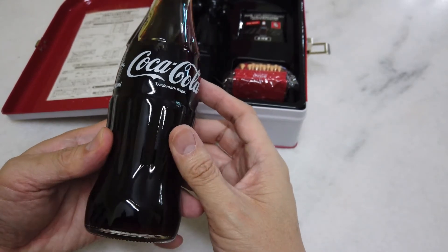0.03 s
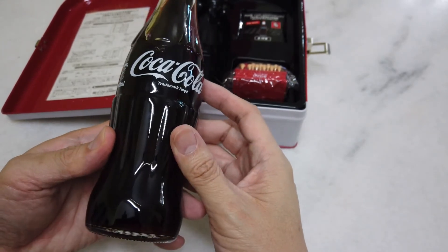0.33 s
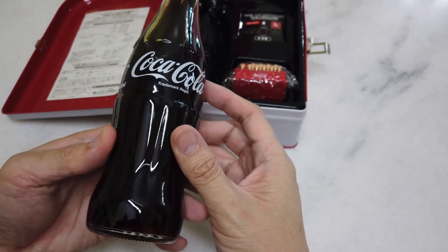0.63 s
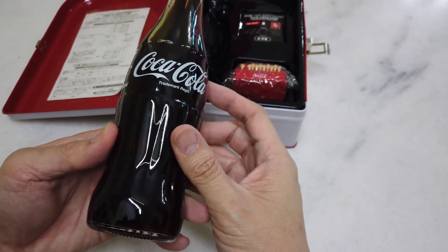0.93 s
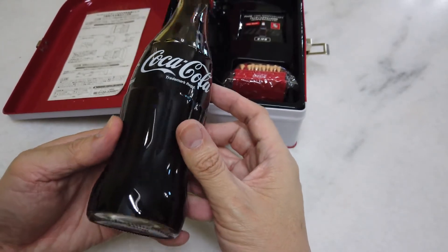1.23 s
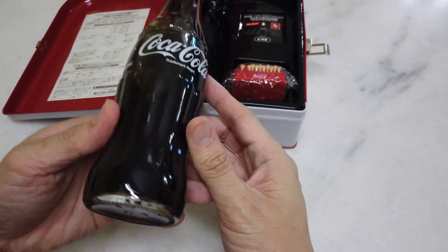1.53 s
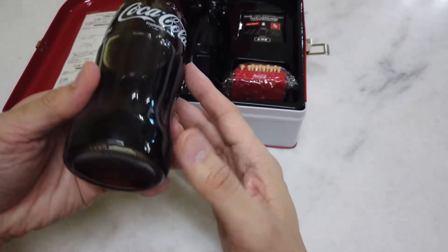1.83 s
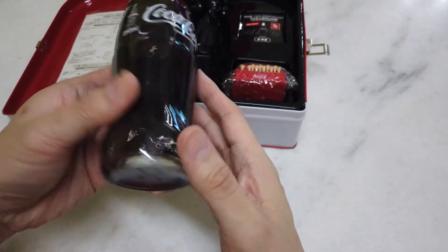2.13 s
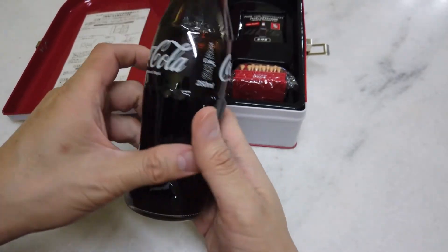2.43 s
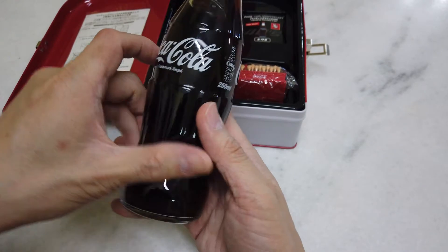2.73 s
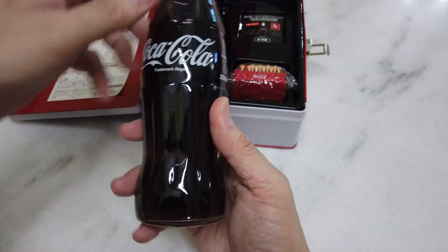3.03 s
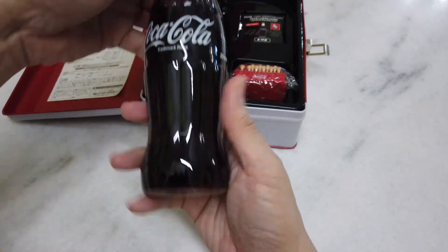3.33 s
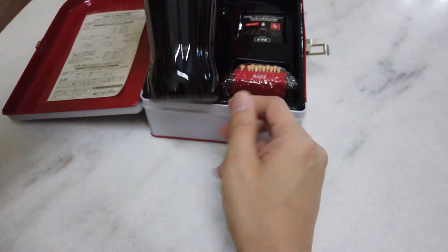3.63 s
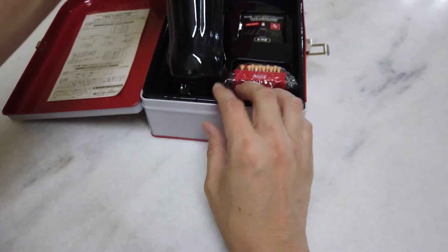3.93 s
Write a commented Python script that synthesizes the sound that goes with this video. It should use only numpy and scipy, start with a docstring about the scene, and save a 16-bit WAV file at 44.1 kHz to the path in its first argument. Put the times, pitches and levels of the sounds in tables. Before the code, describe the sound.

A glass bottle, softly handled at first, lands in a tin box with a clunk and rattle.

```python
"""In a quiet room, a far-off motor drones and something squeals briefly, likely a brake in the street.
Meanwhile hands turn a full glass bottle: skin rubs and slides, fingertips tap and one squeaks.
Near the end an arm sweeps forward, pushing air, and sets the bottle into a tin box on a stone table.
It lands with a low clunk and rocks to rest; the tin rings and the room answers."""
import sys
import numpy as np
from scipy import signal
from scipy.fft import rfft, irfft
from scipy.io import wavfile
from scipy.ndimage import uniform_filter1d

SR = 44100
rng = np.random.default_rng(int(sys.argv[2]) if len(sys.argv) > 2 else 0)


def pcm_store(signal):
    """Save signal as 16-bit PCM."""
    levels = np.round(np.clip(np.atleast_2d(signal), -1, 1) * 32767)
    wavfile.write(sys.argv[1], SR, levels.astype(np.int16).T)


N = 176400
T = np.arange(N) / SR

# The bottle hits the tin. Each _db turns one part of the knock up or down.
# start_s, thud_db, thud_hz, clunk_db, ring_db, crack_and_wash_db, brightness_hz
KNOCKS = [(3.7794, -31, 462, 1.5, 1.5, -7.5, 2300), (3.782, -30.5, 480, -19, 1, -1, 12000),
          (3.7982, -33, 508, -1, -20, -13, 1800), (3.822, -46, 466, -20, 1, -8, 4970),
          (3.8369, -49, 397, -3.5, -14, -15, 2500), (3.884, -45, 470, -14, -24, -13.5, 3500),
          (3.897, -44, 458, -9, -28, -22, 2400), (3.9303, -36, 402, -4, -10.5, -16, 2800)]
# How alike left and right are in the room (1 = the same): frequency_hz, likeness
ROOM_LIKENESS = [(30, 0.99), (200, 1), (450, 0.94), (700, 0.63), (2000, 0.35), (12000, 0.53)]


def bottle_in_tin():
    """Each knock gives a thud, a clunk, a crack and a wash, duller when the contact is soft."""
    # The short tones of the loaded box: pitch_hz, relative_db, fade_s (time to drop 60 dB)
    clunk_tones = [(294, -39, 0.082), (370, -39, 0.1), (806, -29, 0.032), (930, -23, 0.031),
                   (1057, -21, 0.022), (1340, -29, .013), (1630, -25.5, 0.016), (2640, -36, 0.024),
                   (6800, -35, 0.017), (9060, -39, .025)]
    thud_fade_s = 0.073
    out = np.zeros((2, N + SR))
    for start_s, thud_db, thud_hz, clunk_db, _, crack_and_wash_db, brightness_hz in KNOCKS:
        thud = struck([(thud_hz, thud_db, thud_fade_s)])
        clunk = from_db(clunk_db) * struck(clunk_tones)
        knock = thud + clunk + from_db(crack_and_wash_db) * (crack() + wash())
        soft = np.exp(-2 * np.pi * brightness_hz / SR)
        dulled = signal.lfilter([(1 - soft) ** 2], [1, -2 * soft, soft ** 2], knock)
        i = int(start_s * SR)
        out[:, i:i + SR] += dulled
    return out[:, :N]


def tin_walls():
    """Every knock feeds energy into the tin's walls and lid, which ring as it drains away."""
    # The tones of the freely ringing tin: pitch_hz, relative_db, fade_s
    tin_tones = [(294, -5, .55), (442, -7, .4), (497, -4, .5), (684, -9, .6), (787, -9, .4), (862, -1, .4),
                 (876, -3, .45), (959, -6, .6), (1017, -3, .35), (1049, -7, .45), (1411, -7, .55),
                 (1429, -5, .55), (1803, -2.5, .42), (1834, -10, .5), (2057, -12, .55), (2407, -6, .42),
                 (2750, -11, .3), (2904, -9, .4), (3422, -17, .45), (4170, -19, .25), (6620, -13, .16),
                 (6840, -16, .2)]
    tin_db, pan_spread_db = -42.5, 2.5
    start_s, _, _, _, ring_db, _, _ = np.transpose(KNOCKS)
    blows, out = np.zeros(N), 0
    blows[(start_s * SR).astype(int)] = from_db(ring_db) ** 2
    for pitch_hz, relative_db, fade_s in tin_tones:
        kept_per_sample = from_db(-60 / (fade_s * SR)) ** 2
        energy = signal.lfilter([1], [1, -kept_per_sample], blows)
        strength = uniform_filter1d(np.sqrt(energy), size=64)
        pan = from_db(pan_spread_db * rng.standard_normal() * np.array([[1], [-1]]))
        tone = np.sin(2 * np.pi * (pitch_hz * T + rng.random()))
        out = out + from_db(tin_db + relative_db) * pan * strength * tone
    return out


def crack():
    """Glass meets metal with a very short burst of bright noise."""
    # The crack's tone colour: frequency_hz, relative_db
    colour = [(500, -31), (2500, 6), (3500, -4), (4200, -3), (5500, -16), (6700, 7), (7800, -22),
              (9200, -2), (10000, -31), (11500, -15), (15500, -28)]
    # How alike left and right are: frequency_hz, likeness
    likeness = [(1000, 0.57), (5000, 0.076)]
    crack_db, fade_s = -28, 0.014
    return from_db(crack_db - 60 * T[:SR] / fade_s) * stereo_noise(colour, likeness, size=SR)


def wash():
    """Countless weak tin tones and room echoes blur into noise that fades band by band."""
    # The wash's tone colour: frequency_hz, relative_db
    colour = [(120, -40), (200, -14), (280, -2), (470, -3), (600, -9.5), (720, -1.5), (1000, 1),
              (1300, -6.5), (2000, -6), (2850, -6.5), (3400, -13.5), (5200, -18), (6800, -18.5),
              (8500, -23.5), (11000, -24.5), (15500, -32)]
    # How long it takes to die away: frequency_hz, fade_s
    fade_times = [(250, 0.6), (1000, 0.67), (3000, 0.8), (6000, 0.7), (14000, 0.45)]
    # How alike left and right are: frequency_hz, likeness
    likeness = [(250, 0.97), (700, 1), (1400, 0.76), (2800, 0.65), (5000, 0.43), (12000, 0.31)]
    wash_db, build_up_s = -34.5, 0.0011
    t, frequency_hz = T[:SR], np.arange(SR // 2 + 1)
    spectrum = rfft(stereo_noise(colour, likeness, size=SR))
    centres_hz = np.geomspace(200, 14000, 7)
    out = 0
    for hz, share in zip(centres_hz, np.eye(len(centres_hz))):
        band_shape = at_hz(list(zip(centres_hz, share)), frequency_hz)
        band = irfft(spectrum * band_shape, SR)
        out = out + band * from_db(-60 * t / at_hz(fade_times, hz))
    return from_db(wash_db) * out * (1 - np.exp(-t / build_up_s))


def arm_waft():
    """The sweeping arm wafts air over the microphone, making a low, lumpy noise."""
    # The rise and fall of the puff: time_s, level_db
    loudness = [(3.459, -62), (3.56, -40), (3.7, -36), (3.76, -43.5), (3.82, -53), (4.0, -56)]
    # Its tone colour: frequency_hz, relative_db
    colour = [(15, -4.5), (40, 2.5), (80, -9.5), (130, -22), (220, -25.5), (450, -49), (1500, -66)]
    # How alike left and right are: frequency_hz, likeness
    likeness = [(20, .15), (300, 0.69)]
    return level(*np.transpose(loudness)) * stereo_noise(colour, likeness, size=N)


def skin_rubs():
    """Skin rubs on the turning glass with faint, wavering, raspy tones."""
    # One rub a row: start_s, length_s, start_hz, end_hz, level_db
    rubs = [(0.12, 0.17, 401, 410, -59.5), (1.15, 0.52, 247, 196.4, -58.5), (1.482, 0.19, 324, 429, -66.5),
            (2.3, 0.43, 128, 138.5, -61.5), (2.739, 0.12, 180, 176, -64.5), (3.158, 0.13, 178, 185, -65)]
    waver, rasp_db = 0.0356, -4
    out = np.zeros(N)
    for start_s, length_s, start_hz, end_hz, level_db in rubs:
        glide = np.interp(T, [start_s, start_s + length_s], [start_hz, end_hz])
        pitch = glide * (1 + waver * drift(14.9))
        tone = sine(pitch) + from_db(rasp_db) * narrow_noise(pitch, width_hz=29)
        out += from_db(level_db) * swell(start_s, length_s) * rms_one(tone)
    return out


def hand_bumps():
    """The moving hands make low bumps of unsteady pitch."""
    # One bump a row: start_s, length_s, pitch_hz, level_db
    bumps = [(0.849, .11, 42.33, -42.5), (0.98, 0.13, 44.5, -44), (1.614, 0.14, 32, -43.5),
             (3.744, 0.12, 37.85, -38.5)]
    out = np.zeros(N)
    for start_s, length_s, pitch_hz, level_db in bumps:
        tone = sine(pitch_hz * (1 + 0.146 * drift(22.4)))
        out += from_db(level_db) * swell(start_s, length_s) * tone
    return out


def finger_taps():
    """Fingertips land softly on the glass, and the holding hand stops it ringing."""
    # One tap a row: start_s, strength_db
    taps = [(2.15, -56), (2.422, -58), (2.66, -62), (2.808, -55.5), (3.17, -61)]
    # The tones of the held bottle: pitch_hz, relative_db, fade_s
    bottle_tones = [(783, -3, .1), (1224, -7, 0.1)]
    out = np.zeros(N)
    for start_s, strength_db in taps:
        i = int(start_s * SR)
        out[i:i + SR] += from_db(strength_db) * struck(bottle_tones)[:N - i]
    return out


def finger_squeak():
    """One fingertip slips on the glass with a short rising squeak."""
    # The course of the squeak: time_s, pitch_hz, level_db
    squeak = [(2.515, 2176, -76), (2.532, 2200, -70), (2.547, 2330, -62), (2.565, 2290, -70),
              (2.61, 2320, -84)]
    rasp_db = -8
    time_s, pitch_hz, level_db = np.transpose(squeak)
    pitch = np.interp(T, time_s, pitch_hz)
    tone = sine(pitch) + from_db(rasp_db) * narrow_noise(pitch, width_hz=50)
    return level(time_s, level_db) * tone


def finger_slides():
    """Dry skin brushes unevenly over the glass as the fingers find a new grip."""
    # One slide a row: start_s, length_s, level_db
    slides = [(1.88, 0.83, -68.5), (2.723, 0.15, -87)]
    # The tone colour of brushing skin: frequency_hz, relative_db
    colour = [(200, 1), (800, -3), (2000, -1.5), (4000, -12), (7000, -9), (15000, -22)]
    strokes = sum(from_db(db) * swell(start_s, length_s) for start_s, length_s, db in slides)
    grain = from_db(3 * drift(40))
    return strokes * grain * stereo_noise(colour, ROOM_LIKENESS, size=N)


def distant_motor():
    """A far-off motor drones and rumbles while its pitch sinks."""
    # The course of the drone: time_s, pitch_hz, level_db
    drone = [(0, 50, -44), (.12, 48.35, -35), (.25, 45.6, -33.5), (.42, 45.75, -34.5), (.57, 43.23, -35),
             (.68, 42.7, -43), (.8, 43.3, -52)]
    # The rumble's tone colour: frequency_hz, relative_db
    colour = [(20, -15), (70, 7), (110, -7.5), (160, -16), (300, -29), (700, -48)]
    rumble_db = -12.5
    time_s, pitch_hz, level_db = np.transpose(drone)
    pitch = np.interp(T, time_s, pitch_hz)
    rumble = from_db(rumble_db) * stereo_noise(colour, ROOM_LIKENESS, size=N)
    rumble = signal.sosfilt(signal.butter(2, 600, fs=SR, output="sos"), rumble)
    wobble = from_db(0.77 * drift(6.9))
    return level(time_s, level_db) * wobble * (sine(pitch) + rumble)


def distant_squeal():
    """A thin, slightly raspy squeal, likely a brake, swells and fades."""
    # The rise and fall of the squeal: time_s, level_db
    loudness = [(.19, -84), (0.227, -57.5), (.34, -52), (.39, -62.5), (.445, -57.5), (0.504, -59.5),
                (.545, -68.5), (0.661, -71), (.74, -79), (0.8, -80)]
    pitch_hz, waver_hz, rasp_db, flutter_db = 3679, 6.9, -8, 1.2
    tone = sine(pitch_hz + waver_hz * drift(40))
    rasp = from_db(rasp_db) * narrow_noise(pitch_hz, width_hz=140)
    flutter = from_db(flutter_db * drift(60))
    return level(*np.transpose(loudness)) * flutter * (tone + rasp)


def room():
    """The room's rumble and hiss slowly ease off, while appliances hum faintly."""
    # The background's tone colour: frequency_hz, relative_db
    colour = [(15, -26.5), (27, 3.5), (42, -4.5), (75, -6), (100, -10.5), (148, -18.5), (183, -20.5),
              (280, -23), (400, -27.5), (540, -30.5), (615, -26), (690, -26.5), (880, -28), (1400, -30.5),
              (1800, -35.5), (2800, -35), (4200, -44.5), (5200, -46.5), (7000, -43), (8800, -45.5),
              (9350, -40.5), (10000, -56), (10700, -40.5), (11700, -54), (14000, -47), (15500, -53.5)]
    # The appliance tones: pitch_hz, level_db, likeness
    hum_tones = [(178.9, -69.5, 0.97), (614.6, -72.5, 0.05), (887, -77, 0.91), (10700, -86.5, .5)]
    midway_db, change_db_per_s, hum_width_hz = -49.5, -0.92, 2.9
    easing = from_db(midway_db + change_db_per_s * (T - T.mean()))
    out = easing * stereo_noise(colour, ROOM_LIKENESS, size=N)
    for pitch_hz, level_db, likeness in hum_tones:
        hum = pair(narrow_noise(pitch_hz, hum_width_hz), narrow_noise(pitch_hz, hum_width_hz), likeness)
        out += from_db(level_db) * hum
    return out


def struck(tones):
    """A knocked object answers with tones that die quickly: pitch_hz, level_db, fade_s."""
    t, contact_s = T[:SR], 0.0008
    ringing = 0
    for pitch_hz, level_db, fade_s in tones:
        fade = from_db(level_db + rng.normal(0, 1) - 60 * t / fade_s)
        ringing = ringing + fade * np.sin(2 * np.pi * pitch_hz * t)
    return -ringing * (1 - np.exp(-t / contact_s))


def from_db(db):
    """Turn decibels into a number to multiply by."""
    return 10 ** (np.asarray(db) / 20)


def rms_one(x):
    """Scale a signal so its average strength (rms) is 1."""
    return x / np.sqrt(np.mean(x ** 2) + 1e-20)


def at_hz(points, hz):
    """Read between the rows of a frequency table, giving each octave equal room."""
    frequency_hz, value = np.transpose(points)
    return np.interp(np.log(hz + 1e-6), np.log(frequency_hz), value)


def level(time_s, level_db):
    """Loudness that follows the given points and is silent outside them."""
    return from_db(np.interp(T, time_s, level_db, left=-np.inf, right=-np.inf))


def swell(start_s, length_s):
    """A rounded rise and fall."""
    return np.sin(np.pi * np.clip((T - start_s) / length_s, 0, 1))


def drift(rate_hz):
    """A smooth random wander of strength 1 that moves at about this rate."""
    frequency_hz = np.arange(N // 2 + 1) * SR / N
    spectrum = rfft(rng.standard_normal(N))
    return rms_one(irfft(spectrum / (1 + (frequency_hz / rate_hz) ** 2), N))


def sine(pitch_hz):
    """A pure tone of strength 1 that follows a pitch curve."""
    return np.sqrt(2) * np.sin(2 * np.pi * np.cumsum(pitch_hz + 0 * T) / SR)


def narrow_noise(pitch_hz, width_hz):
    """Noise so narrow that it sounds like an unsteady tone."""
    phase = 2 * np.pi * np.cumsum(pitch_hz + 0 * T) / SR
    return drift(width_hz) * np.cos(phase) + drift(width_hz) * np.sin(phase)


def pair(a, b, likeness):
    """Mix two unrelated signals into a left and a right with this likeness."""
    likeness = np.clip(likeness, 0, 1)
    return np.sqrt((1 + likeness) / 2) * a + np.sqrt((1 - likeness) / 2) * b * [[1], [-1]]


def stereo_noise(colour, likeness, size):
    """Noise of strength 1 with this tone colour, partly alike on left and right."""
    frequency_hz = np.arange(size // 2 + 1) * SR / size
    spectra = pair(*rfft(rng.standard_normal((2, size))), at_hz(likeness, frequency_hz))
    return rms_one(irfft(spectra * from_db(at_hz(colour, frequency_hz)), size))


def scene():
    """Add up the landing, the hands and the background."""
    landing = bottle_in_tin() + tin_walls()
    hands = skin_rubs() + hand_bumps() + finger_slides() + finger_squeak() + finger_taps()
    return landing + hands + arm_waft() + distant_motor() + distant_squeal() + room()


def record(dry):
    """Cut away the very highest treble steeply."""
    cutoff_hz = 15700
    return signal.sosfilt(signal.ellip(12, .1, 90, cutoff_hz, fs=SR, output="sos"), dry)


dry = scene()
out = record(dry)
pcm_store(out)
```